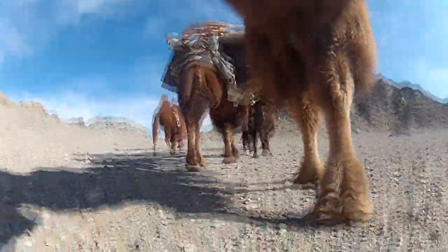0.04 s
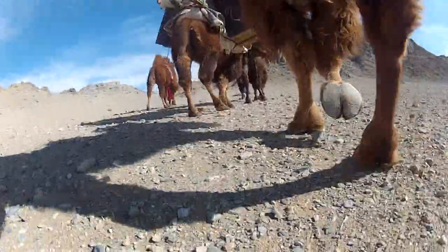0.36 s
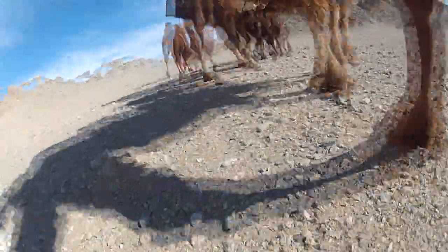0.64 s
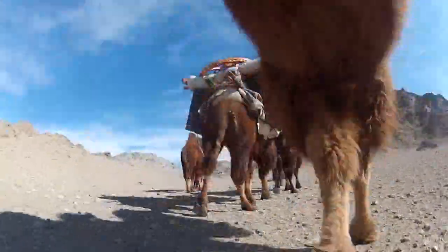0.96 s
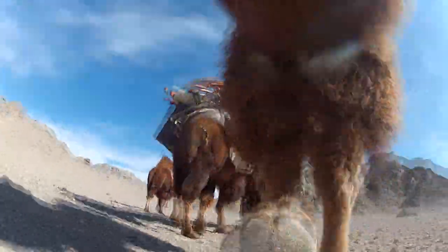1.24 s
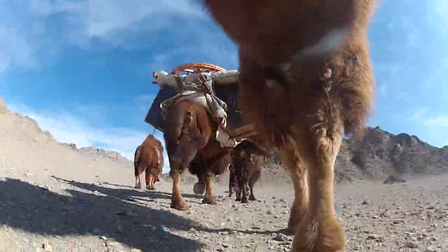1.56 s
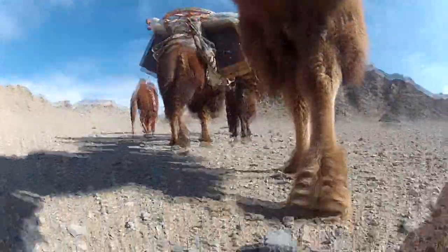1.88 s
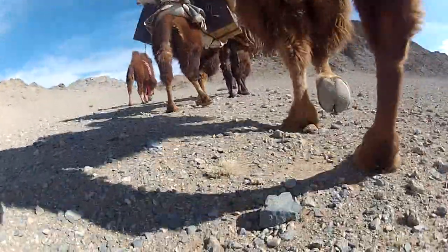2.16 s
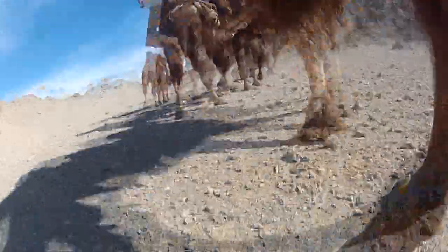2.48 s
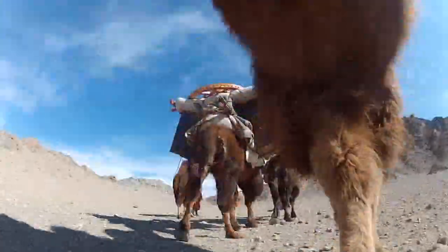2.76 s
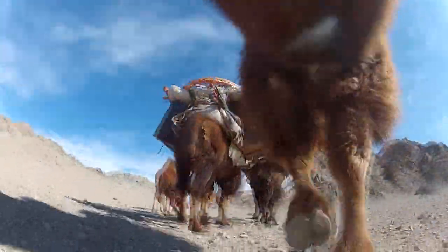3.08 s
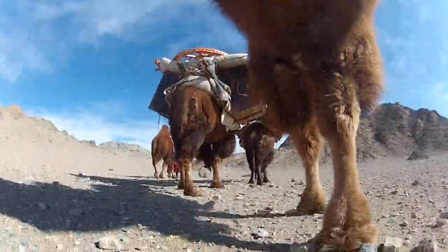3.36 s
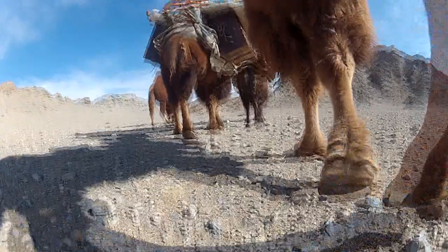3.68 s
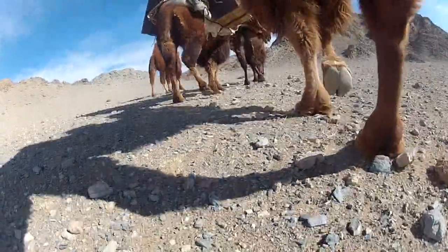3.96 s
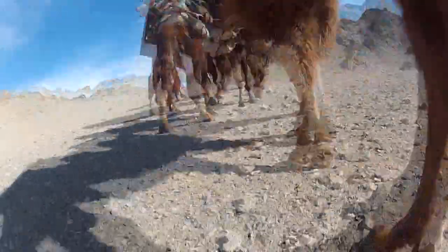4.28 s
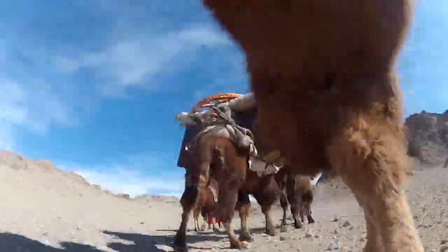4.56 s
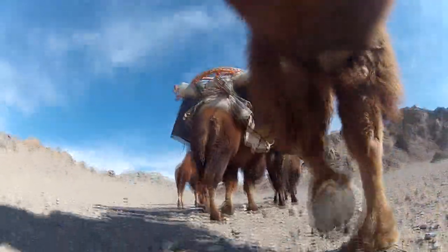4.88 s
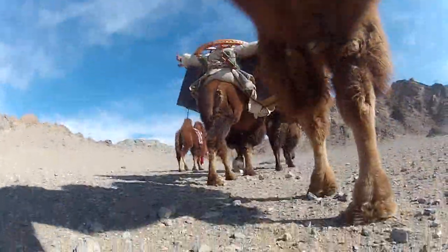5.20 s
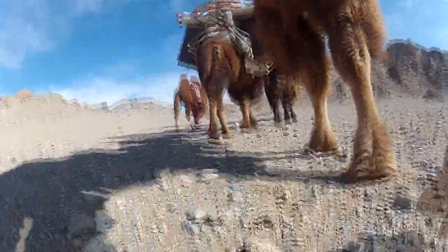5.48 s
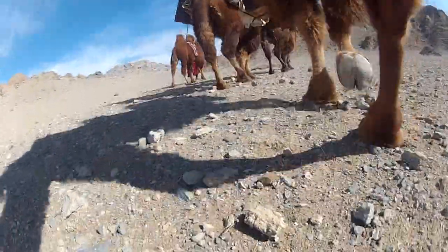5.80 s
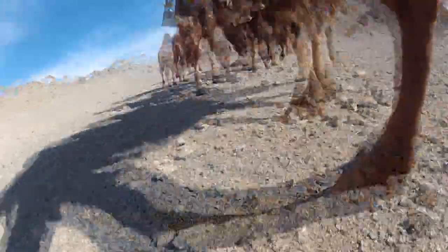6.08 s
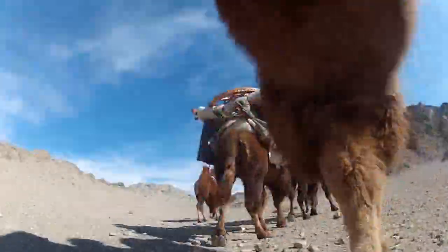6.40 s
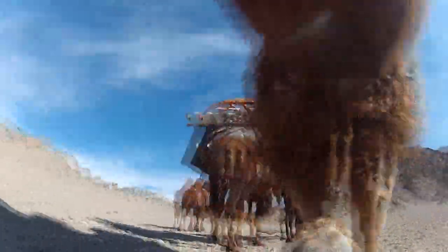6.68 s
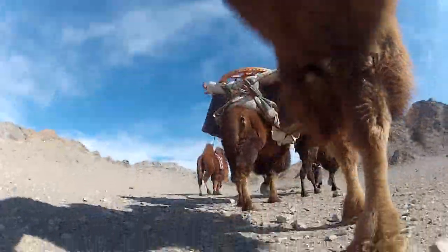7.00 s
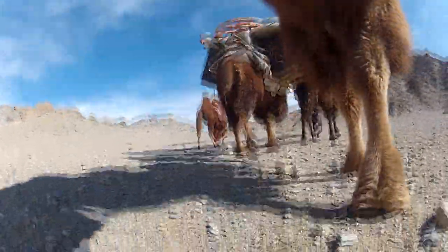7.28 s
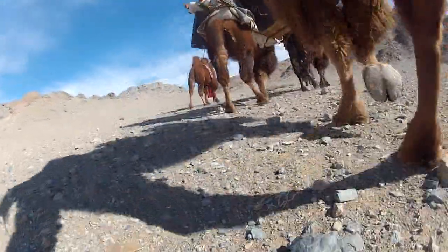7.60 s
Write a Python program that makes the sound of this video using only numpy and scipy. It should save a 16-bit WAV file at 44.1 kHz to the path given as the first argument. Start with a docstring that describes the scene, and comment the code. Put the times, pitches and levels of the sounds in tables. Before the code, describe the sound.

Camels walk over stony desert ground, their soft feet crunching gravel and knocking loose pebbles together. The microphone is strapped to one animal's leg, so four evenly spaced swings each bring a louder rustle and a deep puff of air, some with a strap scrape or a dull thump. Harness metal jingles very faintly, and a low wind remains between strides. Everything is in the right channel.

```python
"""Camels walk over stony desert ground, heard from a small camera strapped to one animal's leg.
Soft feet press the gravel into a crunch and knock loose stones together; harness metal jingles faintly.
Each swing of the leg rustles loudly and pushes air across the microphone; the strap rubs and footfalls
jolt the camera. Between strides a low wind remains. The single microphone feeds only the right channel."""
import sys
import numpy as np
from scipy import signal
from scipy.fft import rfft, irfft, next_fast_len
from scipy.io import wavfile
from scipy.ndimage import uniform_filter1d, map_coordinates

SR = 44100
rng = np.random.default_rng(int(sys.argv[2]) if len(sys.argv) > 2 else 0)


def dump(signal):
    """Clip the signal to [-1, 1] and save it as 16-bit WAV at the path in sys.argv[1]."""
    limited = np.clip(np.atleast_2d(signal).T, -1, 1)
    pcm = np.round(limited * 32767).astype(np.int16)
    wavfile.write(sys.argv[1], SR, pcm)


N = 337365

# swings of the leg that carries the camera, one a stride:
# (fastest moment [s], rustle [dB], run-up [s], buffet [dB], flutter [dB])
LEG_SWINGS = [(1.354, -40, 0.11, -32.5, -47.5), (3.069, -41, 0.073, -34.5, -48.5),
              (4.807, -37.5, 0.062, -30.5, -47.5), (6.649, -51, 0.046, -36.5, -59.5)]


def amp(db):
    """Decibels to gain."""
    return 10 ** (np.asarray(db) / 20)


def unit(x):
    """Scale to rms 1."""
    return x / np.sqrt(np.mean(x ** 2) + 1e-20)


def together(gains):
    """Independent sounds add in power."""
    return np.sqrt(sum(g ** 2 for g in gains))


def add(track, s, sound):
    """Mix a short sound into the track at time s."""
    part = track[max(round(s * SR), 0):][:len(sound)]
    part += sound[:len(part)]


def swell(s, hold, rise, fall):
    """Envelope that reaches 1 at time s, holds and falls; rise and fall are the seconds for 20 dB."""
    t = np.arange(N) / SR - s
    return amp(-20 * (np.maximum(-t, 0) / rise + np.maximum(t - hold, 0) / fall))


def wobble(rate):
    """Smooth random modulation, rate knots a second."""
    knots = rng.standard_normal(int(N * rate / SR) + 4)
    return map_coordinates(knots, [np.arange(N) * rate / SR])


def filtered(x, response):
    """Zero-phase EQ; response gives the gain at each frequency."""
    size = next_fast_len(N + 8192)
    return irfft(rfft(x, size) * response(np.fft.rfftfreq(size, 1 / SR)), size)[:N]


def coloured(x, curve):
    """Minimum-phase EQ along a curve of (frequency [Hz], level [dB]) points."""
    hz, db = np.transpose(curve)
    size = 4096
    gain = amp(np.interp(np.log(np.fft.rfftfreq(size, 1 / SR) + 1), np.log(hz), db))
    cepstrum = irfft(np.log(gain + 1e-6))
    cepstrum[1:size // 2] *= 2  # folding the cepstrum makes the filter causal
    cepstrum[size // 2 + 1:] = 0
    return signal.fftconvolve(x, irfft(np.exp(rfft(cepstrum))))[:N]


def noise(curve):
    """Noise of rms 1, shaped by an EQ curve."""
    return unit(coloured(rng.standard_normal(N), curve))


def grains(rate, spread_db):
    """Tiny impacts at random moments, rate a second: many weak ones, a few strong."""
    strength = amp(spread_db * np.minimum(rng.standard_exponential(N), 4))
    return unit((rng.random(N) < rate / SR) * rng.choice([-1, 1], N) * strength)


def shifting(x, depth_db):
    """Different stones touch from moment to moment, so narrow resonances come and go."""
    spectra = signal.stft(x, nperseg=512)[2]
    patches = uniform_filter1d(rng.standard_normal(spectra.shape), size=3, axis=0)
    patches = unit(uniform_filter1d(patches, size=7, axis=1))
    return unit(signal.istft(spectra * amp(depth_db * patches), nperseg=512)[1][:N])


def eddies(curve, evenness=0.64):
    """Low turbulence whose successive eddies are of similar strength."""
    analytic = signal.hilbert(noise(curve))
    return unit(analytic.real / (np.abs(analytic) + 0.31) ** evenness)


def desert_air():
    """The bed: a low wind rumble and the faint rush of the open desert, both wavering."""
    # EQ of the rumble and of the rush: (frequency [Hz], level [dB])
    rumble_eq = [(15, -6), (50, 5), (120, -5.5), (250, -14), (500, -27), (1500, -54)]
    rush_eq = [(80, -35), (150, -1.5), (300, -4.5), (460, -11), (600, -13.5), (1300, -16.5), (1700, -21),
               (3500, -23), (4500, -26.5), (7000, -31), (9000, -33), (15500, -37.5)]
    rumble = amp(-72.0 + 2.7 * wobble(14)) * noise(rumble_eq)
    rush = amp(-70.5 + 2.1 * wobble(3.97)) * noise(rush_eq)
    return rumble + rush


def harness():
    """Small metal rings rattle against each other as the load sways."""
    # shakes of the harness: (middle [s], length [s], level [dB])
    shakes = [(0.403, 0.055, -77), (1.965, 0.044, -72.5), (2.153, 0.045, -71), (3.272, 0.059, -79),
              (5.084, 0.015, -71), (5.223, 0.042, -66.5), (5.285, 0.05, -75)]
    # modes of the metal: (frequency [Hz], bandwidth [Hz], level [dB])
    modes = [(2380, 120, 0.5), (3480, 130, 4), (8660, 120, -4), (9330, 120, -10), (14400, 150, -12)]
    out, t = np.zeros(N), np.arange(SR // 4) / SR
    middle = t.mean()
    for s, length, db in shakes:
        contacts = (rng.random(len(t)) < 350 / SR) * rng.standard_normal(len(t))
        shake = np.exp(-2 * ((t - middle) / length) ** 2)
        ring = np.zeros(len(t))
        for hz, width, mode_db in modes:
            gain = amp(mode_db + rng.normal(0, 1.5)) * np.sqrt(width)
            ring += gain * np.sin(2 * np.pi * hz * t) * np.exp(-np.pi * width * t)
        jingle = unit(signal.fftconvolve(contacts, ring)[:len(t)])
        add(out, s - middle, amp(db) * shake * jingle)
    return out


def strap_rubs():
    """The strap drags over the woolly leg: a short, hollow scrape in one broad resonance."""
    # rubs of the strap: (middle [s], length [s], level [dB], resonance [Hz])
    rubs = [(1.343, 0.0099, -43, 750), (1.975, 0.098, -66, 1070), (3.067, 0.021, -43, 910),
            (4.799, 0.013, -44, 1060), (6.887, 0.11, -58.5, 1150)]
    out, t = np.zeros(N), np.arange(SR // 3) / SR
    middle = t.mean()
    for s, length, db, hz in rubs:
        fibres = (rng.random(len(t)) < 1800 / SR) * rng.standard_normal(len(t))
        hollow = np.sin(2 * np.pi * hz * t) * amp(-60 * t / 0.0057) * (1 - np.exp(-t / 0.00026))
        stroke = np.exp(-2 * ((t - middle) / length) ** 2)
        scrape = unit(signal.fftconvolve(fibres, hollow)[:len(t)])
        add(out, s - middle, amp(db) * stroke * scrape)
    return out


def camera_jolts():
    """The leg takes the weight and the camera bobs in a short thump, its pitch sagging."""
    # footfalls felt through the leg: (time [s], level [dB], starting pitch [Hz])
    footfalls = [(1.363, -31, 66), (5.483, -41, 101), (6.761, -39, 65), (6.861, -35.5, 80),
                 (6.894, -38.5, 151), (7.59, -42, 102)]
    out, t = np.zeros(N), np.arange(SR // 8) / SR
    for s, db, hz in footfalls:
        phase = 2 * np.pi * np.cumsum(hz * np.exp(-t / 0.072)) / SR
        bob = np.sin(phase) * amp(-60 * t / 0.057) * (1 - np.exp(-t / 0.0067))
        add(out, s, amp(db) * bob / np.abs(bob).max())
    return out


def microphone_wind():
    """Each swing pushes air over the microphone and leaves a wake; puffs and a breeze fill the gaps."""
    # EQ of the sub-bass buffet and of the flutter above it: (frequency [Hz], level [dB])
    buffet_eq = [(12, -15.5), (25, -2), (50, -0.5), (70, -6.5), (110, -30.5), (250, -56), (600, -120)]
    flutter_eq = [(40, -20.5), (80, 2), (120, -2), (190, -14.5), (300, -33), (700, -52), (2000, -120)]
    # puffs of air as the standing leg sways: (time [s], hold [s], buffet [dB], flutter [dB])
    puffs = [(0.57, 0.19, -65.5, -71), (2.252, .04, -61, -65), (2.418, .1, -59, -77),
             (3.505, 0.016, -66, -66), (4.196, 0.06, -56.5, -75), (5.497, 0.024, -49, -53),
             (5.655, 0.047, -50, -62.5), (6.112, 0.075, -55, -67), (6.596, 0.015, -40, -48),
             (6.762, 0.018, -41.5, -46.5), (6.844, 0.085, -44, -48.5), (7.59, 0.016, -58, -56.5)]
    gust_db, wake_db = -4.5, -22  # relative to the swing's buffet
    lead_s, hold_s = 0.033, 0.065
    breeze = amp(3 * wobble(7))
    buffets, flutters = [amp(-72.5) * breeze], [amp(-73.5) * breeze]
    for s, _, _, buffet_db, flutter_db in LEG_SWINGS:
        buffets.append(amp(buffet_db + gust_db) * swell(s - lead_s, hold_s, rise=0.031, fall=0.089))
        buffets.append(amp(buffet_db + wake_db) * swell(s - lead_s, hold_s, rise=0.08, fall=0.24))
        flutters.append(amp(flutter_db) * swell(s - 0.051, hold=0.068, rise=0.022, fall=0.09))
    for s, hold, buffet_db, flutter_db in puffs:
        puff = swell(s, hold, rise=0.019, fall=0.057)
        buffets.append(amp(buffet_db) * puff)
        flutters.append(amp(flutter_db) * puff)
    return together(buffets) * eddies(buffet_eq) + together(flutters) * eddies(flutter_eq)


def air_shoves():
    """Air shoves the microphone as the leg speeds up and again as it stops: two soft pressure pulses."""
    lead_s, gap_s, width_s = 0.0193, 0.0598, 0.0063
    start_db, stop_db = 6.5, 2  # relative to the swing's buffet
    out, t = np.zeros(N), np.arange(N) / SR
    for s, _, _, buffet_db, _ in LEG_SWINGS:
        for delay, db in [(0, start_db), (gap_s, stop_db)]:
            offset = (t - s + lead_s - delay) / width_s
            pulse = (offset ** 2 - 1) * np.exp(-offset ** 2 / 2)  # a dip with a rebound on either side
            out += amp(buffet_db + db) * pulse
    return out


def loose_chips(effort):
    """Chips chatter for a few milliseconds each around the caravan's feet, louder as the effort grows."""
    # EQ of the chips: (frequency [Hz], level [dB])
    chip_eq = [(400, -29), (1200, -3.5), (3200, 3), (5000, -10.5), (10000, -11), (16000, -13.5)]
    t = np.arange(SR // 50) / SR
    decay = amp(-60 * t / 0.013)
    energy = signal.fftconvolve(grains(rate=55, spread_db=1.5) ** 2, decay ** 2)[:N]
    chatter = unit(np.sqrt(np.abs(energy)) * shifting(noise(chip_eq), depth_db=4.0))
    effort_db = 20 * np.log10(effort)
    return amp(-71.5 + 0.54 * (effort_db + 57)) * chatter


def grit_scratches():
    """Sharp grit skids over stone in short, bright ticks of noise."""
    # skids of grit: (time [s], level [dB])
    skids = [(1.226, -48.5), (1.4186, -44), (2.338, -54), (2.446, -50.5), (2.8713, -55.5), (2.9395, -49),
             (3.0904, -49), (3.1265, -45.5), (4.543, -55), (4.7284, -45.5), (4.787, -38), (4.8296, -40.5),
             (4.893, -57.5), (6.7162, -44), (6.7685, -51)]
    # EQ of a skid: (frequency [Hz], level [dB])
    grit_eq = [(1000, -52), (2800, -9), (3600, 5), (5000, -2), (8200, -4.5), (10000, -21), (16000, -30)]
    envelope, t = np.zeros(N), np.arange(SR // 10) / SR
    for s, db in skids:
        add(envelope, s, amp(db - 60 * t / 0.03) * (1 - np.exp(-t / 0.00091)))
    return envelope * noise(grit_eq)


def pebble_clicks():
    """Pebbles click together: each rings for a few milliseconds in four modes, over a sharp crack."""
    # pebble hits: (time [s], level [dB], nominal pitch [Hz], crack within the click [dB])
    hits = [(0.496, -38, 1200, -10.5), (0.512, -39.5, 1130, -19), (0.807, -41, 2180, 1),
            (0.897, -39.5, 954, -3), (2.256, -38, 1225, -10.5), (2.312, -40.5, 1220, -10),
            (2.852, -42.5, 1280, -11), (3.035, -31.5, 2190, -10), (3.276, -49, 1340, -10),
            (3.315, -51, 1090, -11), (3.357, -55, 2480, -4), (4.059, -43.5, 1170, -14),
            (4.08, -41.5, 1790, -12), (4.199, -40.5, 1740, -12), (4.271, -44, 2240, -3),
            (4.75, -30.5, 1800, -10), (4.783, -30, 1090, -6), (5.044, -40, 1190, -3),
            (5.784, -36.5, 1250, -11), (5.803, -41, 1214, -8), (5.827, -47, 1260, -6.5),
            (5.976, -47, 1200, -9), (6.009, -43.5, 1310, -4), (6.102, -43.5, 900, -2),
            (6.136, -44, 2130, -7), (6.253, -42.5, 1160, -4), (6.442, -42, 1275, -4),
            (6.583, -50, 1370, -5), (6.599, -38.5, 1210, 0), (6.723, -34, 1910, -6),
            (6.86, -31, 955, -13.5), (7.176, -47.5, 1940, -5)]
    modes = [(0.45, -8.5), (1, 5), (1.8, -2.5), (2.5, -7)]  # (pitch ratio, level [dB])
    out, t = np.zeros(N), np.arange(SR // 20) / SR
    for s, db, hz, crack_db in hits:
        ring = np.zeros(len(t))
        for ratio, mode_db in modes:
            gain = amp(mode_db + rng.normal(0, 1.3))
            mode_hz = hz * ratio * rng.normal(1, 0.071)
            ring += gain * np.sin(2 * np.pi * mode_hz * t) * amp(-60 * t / 0.0086)
        crack = amp(crack_db) * rng.standard_normal(len(t)) * amp(-60 * t / 0.012)
        click = (ring + crack) * (1 - np.exp(-t / 0.00077))
        add(out, s, amp(db) * click / np.abs(click).max())
    return out


def stone_knocks():
    """A larger stone rocks under a padded foot: a dead knock with a faint edge."""
    # rocking stones: (time [s], level [dB], pitch [Hz])
    stones = [(0.562, -32.5, 780), (2.328, -35, 770), (3.678, -42.5, 1110), (5.853, -32.5, 773),
              (6.861, -52, 890), (6.909, -36.5, 850), (7.588, -41.5, 900)]
    out, t = np.zeros(N), np.arange(SR // 20) / SR
    for s, db, hz in stones:
        # neighbouring modes swing in opposite senses and merge into one broad clack
        phase = 2 * np.pi * hz * t
        clack = (np.sin(phase) - 0.44 * np.sin(1.68 * phase)) * amp(-60 * t / 0.014)
        thud = -0.42 * np.sin(2 * np.pi * 290 * t) * amp(-60 * t / 0.021)
        edge = 0.12 * rng.standard_normal(len(t)) * amp(-60 * t / 0.016)
        knock = clack + thud + edge
        add(out, s, amp(db) * knock / np.abs(knock).max())
    return out


def tread_envelope():
    """Weight comes on and off each foot; the gravel around it shifts a little before and after."""
    # feet pressing into the gravel: (time [s], time under load [s], crunch [dB])
    steps = [(.585, .2, -57.5), (.88, 0.05, -58.5), (.96, 0.048, -62.5), (1.075, .11, -67.5),
             (1.415, 0.0094, -53), (1.51, .02, -75), (1.652, 0.0083, -89), (.38, 0.19, -74.5),
             (1.94, 0.12, -76), (2.145, 0.018, -64.5), (2.26, 0.13, -62), (2.405, 0.086, -56.5),
             (2.53, 0.011, -59), (2.66, 0.092, -61), (2.8, 0.16, -66), (4.075, 0.033, -58.5),
             (4.155, 0.014, -57), (4.202, 0.012, -51.5), (4.29, 0.038, -58.5), (4.385, 0.088, -60),
             (4.52, .18, -64), (5.925, 0.067, -59), (6.025, 0.05, -56), (6.14, 0.035, -58),
             (6.268, 0.039, -52), (6.37, .03, -63.5), (6.53, 0.028, -63.5), (6.695, 0.066, -53.5),
             (6.805, 0.11, -62), (7.04, 0.035, -67), (7.52, 0.024, -64)]
    settle_db, far_feet_db, uneven_ground_db = -12.5, -79.5, 0.88
    loads = [amp(db) * swell(s, hold, rise=0.053, fall=0.041) for s, hold, db in steps]
    settling = [amp(db + settle_db) * swell(s, hold, rise=0.33, fall=0.33) for s, hold, db in steps]
    return together(loads + settling + [amp(far_feet_db)]) * amp(uneven_ground_db * wobble(30))


def swing_envelope():
    """The rustle grows as the leg gathers speed and dies quickly after its fastest moment."""
    growth_db_per_s = 116
    t = np.arange(N) / SR
    swings = []
    for s, db, run_up, _, _ in LEG_SWINGS:
        crescendo = amp(db - growth_db_per_s * np.maximum(s - t, 0))
        swings.append(crescendo * swell(s - run_up, run_up, rise=0.051, fall=0.053))
    return together(swings)


def gravel_crunch(tread, swing):
    """Stones slip in little avalanches under the feet; the fast swing scuffs them into a rustle."""
    # EQ of trodden and of scuffed gravel: (frequency [Hz], level [dB])
    trodden_eq = [(240, -43), (400, -11), (620, -11.5), (860, -2), (1200, 0.5), (2000, -3.5), (3700, -11),
                  (5200, -18.5), (7000, -18.5), (9700, -14.5), (11500, -20), (13800, -16), (15500, -24.5)]
    scuffed_eq = [(120, -31.5), (240, -9), (380, -17), (600, -14.5), (800, -3.5), (1000, -3.5),
                  (1250, -3.5), (1750, -2.5), (2050, -8), (3700, -12.5), (5500, -18), (9900, -18),
                  (13400, -20.5), (15500, -23)]
    tread_grit_db, swing_grit_db = -11, -9.5  # fine grit relative to the coarse stones
    trodden = coloured(grains(rate=3600, spread_db=3.3) + 0.52 * rng.standard_normal(N), trodden_eq)
    scuffed = coloured(grains(rate=2200, spread_db=4.0) + 0.59 * rng.standard_normal(N), scuffed_eq)
    avalanches = unit(amp(1.22 * wobble(70) + 1.77 * wobble(260)))
    lowpass = lambda hz: 1 / (1 + (hz / 3900) ** 8)
    out = np.zeros(N)
    for envelope, texture, grit_db in [(tread, trodden, tread_grit_db), (swing, scuffed, swing_grit_db)]:
        stones = avalanches * shifting(texture, depth_db=2.5)
        coarse = unit(filtered(stones, lowpass))
        fine = unit(filtered(stones, lambda hz: 1 - lowpass(hz)))
        out += envelope * (coarse + amp(grit_db) * fine)
    return out


def scene():
    """Everything reaches one microphone on the right channel; the left stays silent."""
    tread, swing = tread_envelope(), swing_envelope()
    gravel = gravel_crunch(tread, swing) + loose_chips(together([tread, swing]))
    stones = stone_knocks() + pebble_clicks() + grit_scratches()
    gear = camera_jolts() + harness() + strap_rubs()
    air = air_shoves() + microphone_wind() + desert_air()
    return np.array([np.zeros(N), 2 * (gravel + stones + gear + air)])


def record(dry):
    """The microphone's housing colours the treble; nothing passes above the band limit."""
    # peaks and dips of the housing: (centre [Hz], width [Hz], gain [dB])
    housing_eq = [(1570, 153, -2.5), (2350, 290, 2.5), (2970, 103, -3), (3820, 60, 3.5), (4300, 450, -2.5),
                  (6010, 330, -13.5), (7610, 820, -2.5), (8320, 130, 4.5), (9780, 460, 2.5),
                  (12020, 520, -19)]
    band_limit_hz = 15650

    def response(hz):
        gain_db = sum(db * np.exp(-((hz - centre) / width) ** 2) for centre, width, db in housing_eq)
        return amp(gain_db) * (hz < band_limit_hz)

    return np.array([filtered(channel, response) for channel in dry])


dry = scene()
out = record(dry)
dump(out)
```